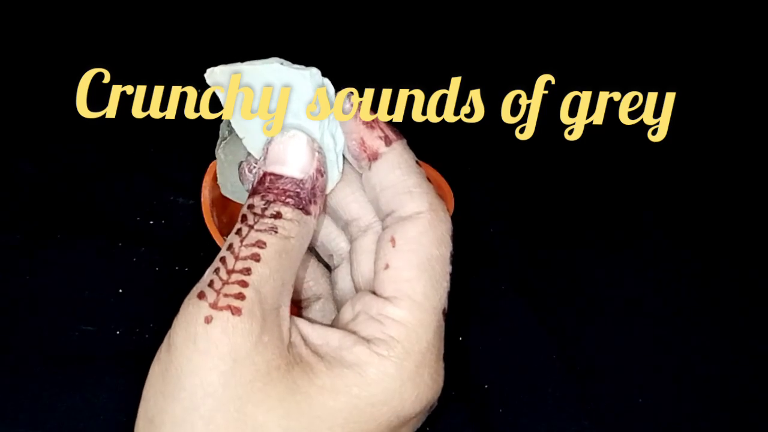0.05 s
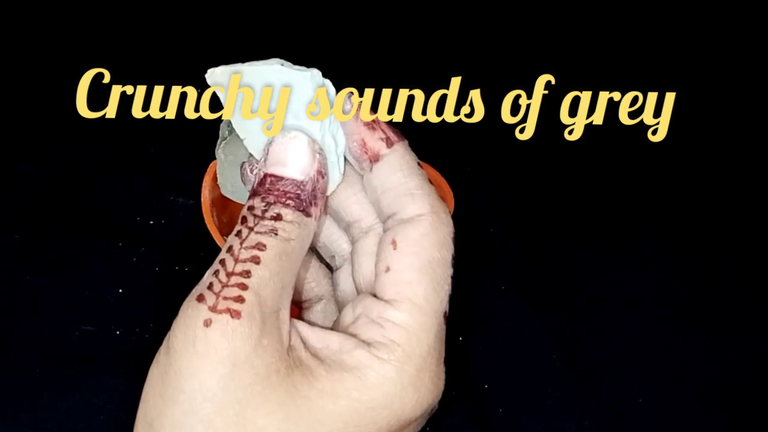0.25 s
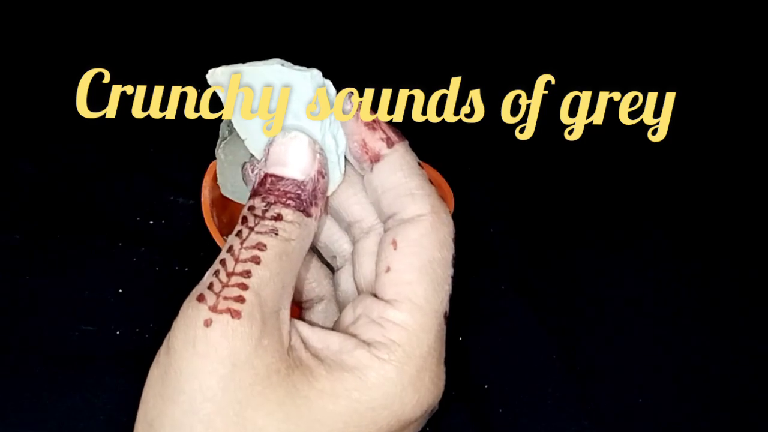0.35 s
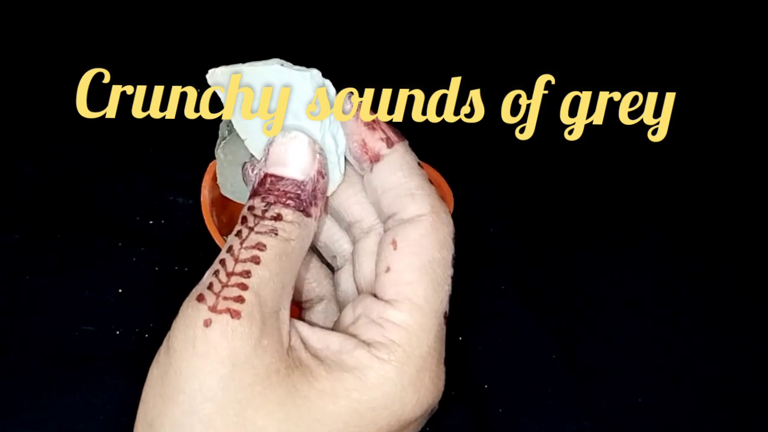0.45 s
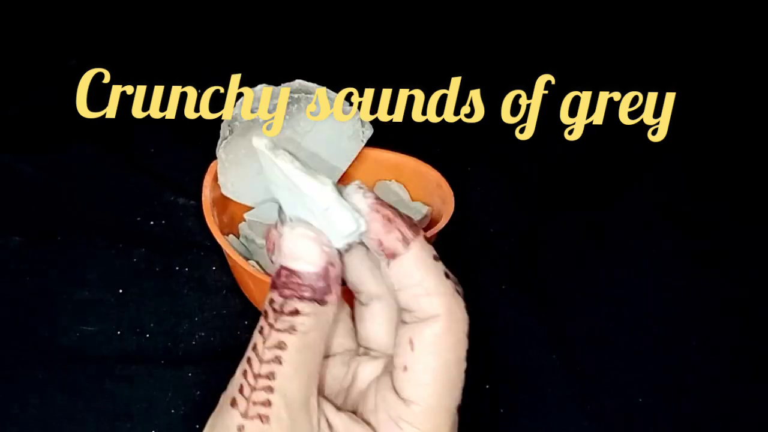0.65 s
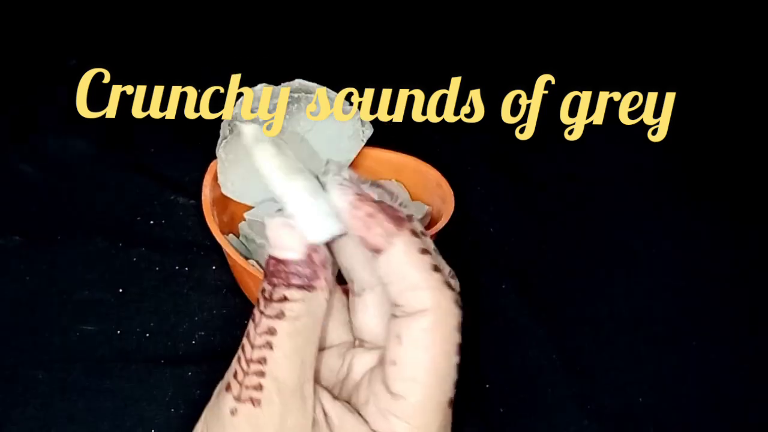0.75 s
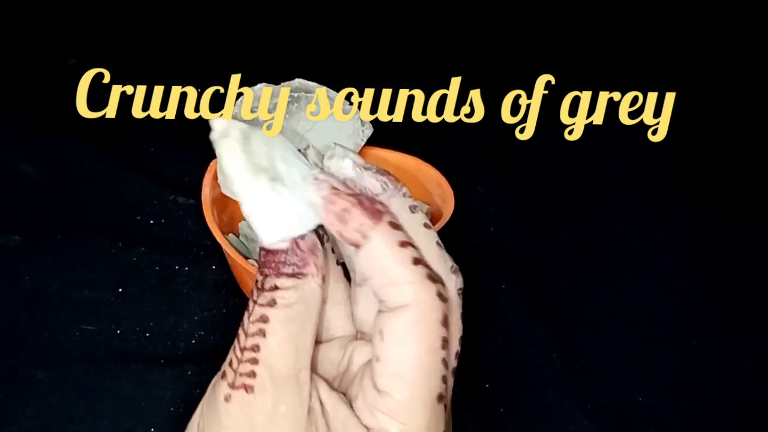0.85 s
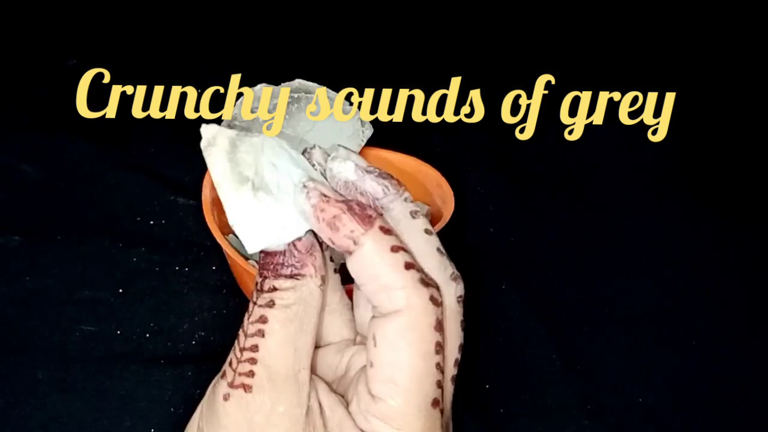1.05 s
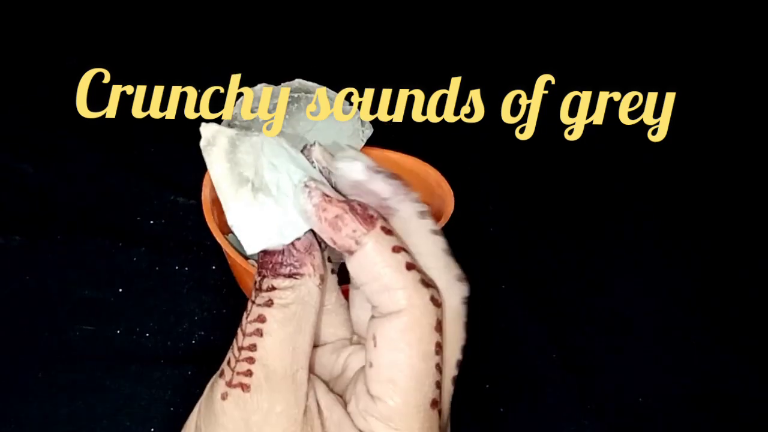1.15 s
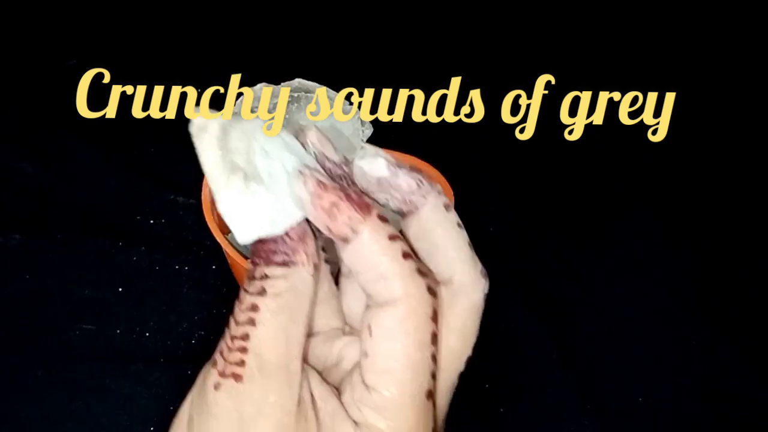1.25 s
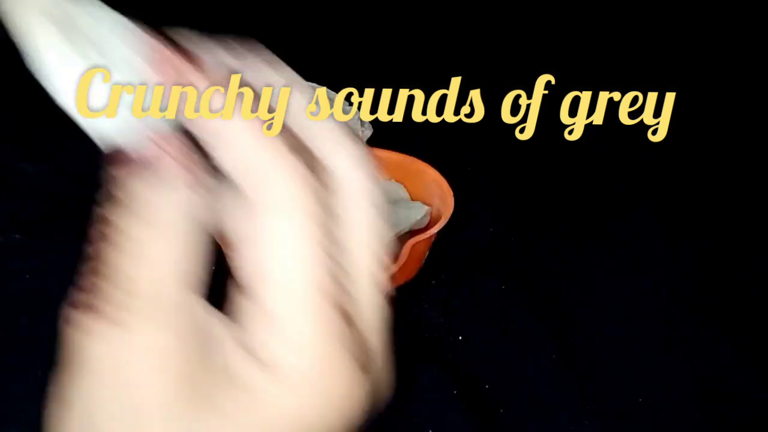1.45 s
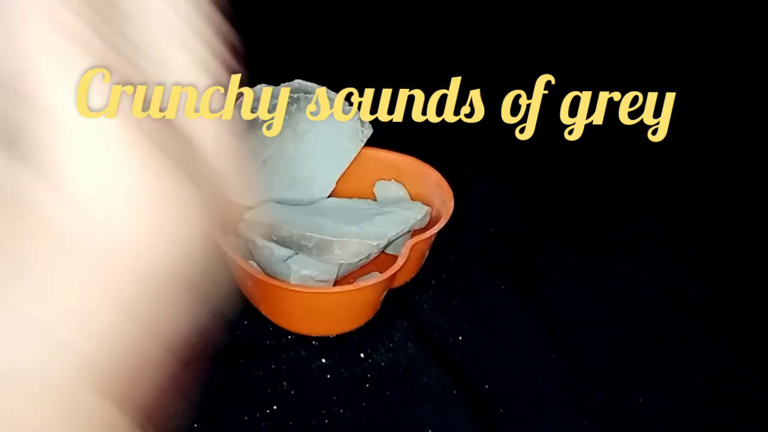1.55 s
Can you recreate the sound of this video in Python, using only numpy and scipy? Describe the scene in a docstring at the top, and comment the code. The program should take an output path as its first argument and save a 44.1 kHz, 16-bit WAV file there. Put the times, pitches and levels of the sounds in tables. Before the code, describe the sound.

Dry clay snaps by hand with a quick run of brittle cracks, then near silence.

```python
"""In a small quiet room, fingers snap a slab of dry clay close to the microphone.
It strains twice, then gives way in a quick run of cracks, each a brittle snap (the clay rings)
over a hollow thump (the slab jolts in the hand). A crumb drops, fingers rub the pieces, and later
a few grains tick. A thin high hiss and a faint low drone go on throughout."""
import sys
import numpy as np
from scipy import signal
from scipy.fft import rfft, irfft
from scipy.io import wavfile

SR = 44100
rng = np.random.default_rng(int(sys.argv[2]) if len(sys.argv) > 2 else 0)


def to_wav(s):
    """Save 16-bit WAV."""
    ch = np.atleast_2d(s).T  # columns
    pcm = np.round(np.clip(ch, -1, 1) * 32767)  # PCM
    wavfile.write(sys.argv[1], SR, pcm.astype(np.int16))


N = 70560
LEFT_GRAIN_DB = -39   # dust and grains are almost only on the right

# the cracks in the slab: (time [s], thump level [dB], thump pitch [Hz], thump bandwidth [relative],
# snap level [dB], snap brightness [Hz])
CRACKS = [(0.2045, -35, 290, 0.43, -39, 2460), (0.2201, -33.5, 339, 0.26, -48.5, 1200),
          (0.2482, -13, 347, 0.59, -15.5, 8000), (0.2665, -12, 329, 0.51, -22, 7000),
          (0.2920, -12.5, 376.4, 0.7, -16.5, 7500), (0.3002, -18, 334, 0.5, -28, 6500),
          (0.3095, -21.5, 375, 0.74, -50, 3500)]


def snaps():
    """At each crack, one sharp break and a burst of splinters make the clay ring; dust fizzes on top."""
    # the tones of the clay: (pitch [Hz], level [dB], time to fade 60 dB [s])
    clay_tones = [(994, -17, .011), (1456, -13, 0.013), (2240, -13, 0.01), (2550, -9, 0.00708),
                  (3180, -2, 0.0033), (3872, -7.5, 0.0092), (4166, -8, 0.0086), (5136, -9.5, 0.0059),
                  (6530, -1.5, 0.0017), (7570, -8.5, 0.0042), (8550, -12, 0.0027)]
    force, dust = 0, 0
    for start, _, _, _, db, bright_hz in CRACKS:
        start += .0005   # the slab starts to move just before it parts
        splinters = from_db(-9) * shower(start, per_s=12000, fade_s=0.0092)
        splinters = butter(splinters, 7500, "low")   # duller than the break itself
        force += from_db(db) * butter(splinters - click(start), bright_hz, "low")
        dust_db = 1.41 * db - 8   # only hard cracks raise much dust
        dust += from_db(dust_db) * shower(start, per_s=6400, fade_s=0.018)
    left, right = place(ring_tones(bending_waves(force), clay_tones), left_db=-11.5)
    left = butter(left, 7000, "low")
    fizz = butter(dust, 10500, "high", order=4)
    return np.array([left, right]) + place(fizz, LEFT_GRAIN_DB)


def bending_waves(force, spread=0.28, stages=14):
    """Treble crosses the slab first, smearing each snap; these filters delay the low notes more."""
    return signal.sosfilt([[-spread, 1, 0, 1, -spread, 0]] * stages, force)


def thumps():
    """Each crack jolts the slab in the cupped hand: a few slow swings, damped by the grip."""
    out = 0
    for start, db, hz, width, _, _ in CRACKS:
        band_hz = hz * np.exp(np.array([-.5, .5]) * width)
        jolt = butter(-click(start), band_hz, "band")
        out += from_db(db) * jolt / np.abs(jolt).max()
    out = butter(out, 615, "low", order=3)
    return place(butter(out, 261, "high", order=1), left_db=-10.5)


def crumb():
    """A loose piece lands with a dull tap."""
    # its hits: (time [s], level [dB])
    hits = [(0.4913, -37.5), (0.4928, -42.5)]
    # the tones of what it lands on: (pitch [Hz], level [dB], time to fade 60 dB [s])
    surface_tones = [(249, 0, 0.025), (484, -1.5, 0.018), (914, 0, 0.019), (1100, -4.5, 0.015),
                     (1194, -9, 0.016), (2400, -6, 0.0062), (4300, 1, 0.032)]
    clicks = sum(from_db(db) * click(start) for start, db in hits)
    force = butter(clicks, [156, 1770], "band")
    return place(ring_tones(force, surface_tones), left_db=-18)


def grains():
    """Dry grains break under the fingers with tiny, very bright ticks."""
    # the ticks: (time [s], level [dB], lower edge [Hz])
    ticks = [(0.678, -56, 7000), (1.569, -39.5, 12000), (1.5786, -34.5, 11000), (1.5916, -34, 13240),
             (1.5941, -29, 3380)]
    out = 0
    for start, db, low_hz in ticks:
        spray = from_db(-2.5) * shower(start, per_s=15000, fade_s=0.012)
        out += from_db(db) * butter(click(start) + spray, low_hz, "high")
    return place(out, LEFT_GRAIN_DB)


def rubs(release_s=0.01):
    """Fingertips slide over the dusty clay: tiny friction clicks swell and stop."""
    # the strokes: (peak time [s], rise time [s], level [dB], lower edge [Hz], upper edge [Hz])
    strokes = [(0.227, 0.054, -57, 2400, 7780), (0.49, 0.04, -72.5, 6400, 7700),
               (0.83, 0.0088, -73, 6500, 8100), (0.83, 0.045, -62, 200, 267.7),
               (1.225, 0.019, -71, 7000, 8300)]
    t, out = np.arange(N) / SR, 0
    for peak, rise_s, db, low_hz, high_hz in strokes:
        grit = butter(random_clicks(per_s=2700), low_hz, "high")
        grit = unit_level(butter(grit, high_hz, "low", order=6))
        swell = np.exp(-np.maximum((peak - t) / rise_s, (t - peak) / release_s))
        out += from_db(db) * grit * swell
    return place(out, left_db=-15)


def room_echo(sound, build_s=0.0009, left_db=-3.5):
    """The room adds a faint, blurred echo that fades at its own speed in each band."""
    # the echo: (lower edge [Hz], upper edge [Hz], level [dB], time to fade 60 dB [s])
    bands = [(93, 358, -15, 0.421), (314, 650, -13.5, 0.34), (804, 1960, -9, 0.33),
             (1900, 9270, -13.5, 0.29)]
    t, tail = np.arange(SR // 2) / SR, 0
    for low_hz, high_hz, db, fade_s in bands:
        noise = rng.standard_normal((2, len(t))) * (1 - np.exp(-t / build_s))
        noise = unit_level(noise * fade(t, fade_s)) / np.sqrt(len(t))
        tail += from_db(db) * butter(noise, [low_hz, high_hz], "band", order=3)
    return signal.fftconvolve(sound[None], tail, axes=1)[:, :N] * from_db([[left_db], [0]])


def hiss(rise_s=0.001, settle_s=0.016):
    """A thin band of high noise wavers and now and then flares up."""
    # the band: (pitch [Hz], width [Hz], left level [dB], right level [dB], left-right likeness [-1..1])
    band = (6303, 347.5, -56.5, -54, -0.08)
    # its wavering: (time [s], level change [dB])
    swell = [(0, -2), (0.25, -4.5), (0.42, -3), (0.48, 5), (0.548, -4), (0.61, 0.5), (0.68, -4.5),
             (0.849, 1.5), (0.901, -3), (0.97, 2), (1.04, -2.5), (1.11, 0), (1.179, -1.5), (1.311, -2.5),
             (1.6, -1)]
    # its flares: (time [s], boost [dB])
    flares = [(0.573, 9), (0.694, 6.5), (1.336, 9), (1.469, 5.5)]
    t, flare_db = np.arange(N) / SR, 0
    for peak, db in flares:
        onset = np.clip((t - peak) / rise_s + 1, 0, 1)
        flare_db += db * onset * np.exp(-np.abs(t - peak) / settle_s)
    return fluttering_band(band, swell, flare_db)


def drone():
    """A narrow band of low noise swells and fades."""
    # the band: (pitch [Hz], width [Hz], left level [dB], right level [dB], left-right likeness [-1..1])
    band = (335, 20, -67, -64.5, -0.31)
    # its swelling: (time [s], level change [dB])
    swell = [(0, -4.5), (0.1, -17), (0.3, -8), (0.448, 1.5), (0.68, 2), (0.79, 7), (0.87, 3), (0.91, -4.5),
             (0.96, 2), (1.142, 2.5), (1.185, -12), (1.24, -0.5), (1.32, -13), (1.39, -0.5), (1.51, -8),
             (1.6, 1.5)]
    return fluttering_band(band, swell)


def room_noise(level_db=-66.5, left_db=-3, sink_db_per_s=1.95):
    """Soft room noise slowly gets quieter."""
    # its tone colour: (frequency [Hz], relative level [dB])
    colour = [(25, -14), (60, -9), (100, 7), (150, -7.5), (220, 8.5), (285, -3.5), (440, -4.5), (620, -11),
              (950, -10.5), (1300, -13.5), (5000, -17), (8500, -31.5), (13000, -23), (15300, -35.5)]
    # how alike left and right are: (frequency [Hz], likeness [-1..1])
    likeness = [(30, 0.96), (200, 0.38), (500, 0.075), (1500, 0.037), (15000, 0.046)]
    t, freqs = np.arange(N) / SR, np.arange(N // 2 + 1) * SR / N
    noise = stereo_noise(from_db(at_hz(colour, freqs)), at_hz(likeness, freqs))
    return from_db(level_db - sink_db_per_s * t + [[left_db], [0]]) * noise


def fluttering_band(band, swell, flare_db=0, flutter_db=2.3, flutter_hz=8.4, top_hz=6550):
    """Noise around one pitch; its level follows the swell and flutters a little at random."""
    hz, width, left_db, right_db, likeness = band
    t, freqs = np.arange(N) / SR, np.arange(N // 2 + 1) * SR / N
    flutter = irfft(rfft(rng.standard_normal(N)) / (1 + (freqs / flutter_hz) ** 2), N)
    db = np.interp(t, *np.transpose(swell)) + flare_db + flutter_db * unit_level(flutter)
    hump = 1 / (1 + np.abs((freqs - hz) / (0.78 * width)) ** 2.78)
    steep_top = 1 / np.sqrt(1 + (freqs / top_hz) ** 40)
    return from_db(db + [[left_db], [right_db]]) * stereo_noise(hump * steep_top, likeness)


def stereo_noise(gain, likeness):
    """Noise shaped by a gain and a left-right likeness at each frequency."""
    shared, opposed = rfft(rng.standard_normal((2, N)))
    spectrum = np.sqrt(1 + likeness) * shared + np.sqrt(1 - likeness) * opposed * [[1], [-1]]
    return unit_level(irfft(gain * spectrum, N))


def place(sound, left_db, lead_s=0.00034):
    """The microphone's left side hears the hands earlier and weaker."""
    n = np.arange(N)
    left = from_db(left_db) * np.interp(n + round(lead_s * SR), n, sound)
    return np.array([left, sound])


def click(time_s):
    """One click of height 1."""
    return 1. * (np.arange(N) == int(time_s * SR))


def random_clicks(per_s):
    """Clicks at random times and strengths."""
    return (rng.random(N) < per_s / SR) * rng.standard_normal(N)


def shower(start, per_s, fade_s):
    """A burst of random clicks that dies away."""
    return random_clicks(per_s) * fade(np.arange(N) / SR - start, fade_s)


def fade(t, fade_s):
    """Silent until t = 0, then falling from 1 by 60 dB every fade_s."""
    return (t > 0) * from_db(-60 * np.maximum(t, 0) / fade_s)


def ring(force, hz, fade_s):
    """Each push starts a tone that dies away."""
    decay, angle = from_db(-60 / (fade_s * SR)), 2 * np.pi * hz / SR
    return signal.lfilter([.5, 0, -.5], [1, -2 * decay * np.cos(angle), decay * decay], force + 1e-18)


def ring_tones(force, tones):
    """A struck object rings with all its tones; neighbours swing in opposite directions."""
    return sum((-1) ** k * from_db(db) * ring(force, hz, fade_s)
               for k, (hz, db, fade_s) in enumerate(tones))


def butter(sound, hz, kind, order=2):
    """Keep what is below hz ("low"), above it ("high") or between two edges ("band")."""
    return signal.sosfilt(signal.butter(order, hz, kind, fs=SR, output="sos"), sound + 1e-18)


def at_hz(points, hz):
    """Read between a table's rows on a pitch-like (log) scale."""
    freqs, values = np.transpose(points)
    return np.interp(np.log(hz + 1), np.log(freqs), values)


def from_db(db):
    """Turn decibels into a multiplier."""
    return 10 ** (np.asarray(db) / 20)


def unit_level(sound):
    """Scale to an average (rms) level of 1."""
    return sound / np.sqrt(np.mean(sound ** 2) + 1e-20)


def scene():
    """The clay and its echo, over the background."""
    clay = thumps() + snaps() + crumb() + grains() + rubs()
    return clay + room_echo(clay[1]) + room_noise() + drone() + hiss()


def record(dry):
    """The microphone's opening rings at a very high pitch; above that the sound is cut steeply."""
    ring_hz, ring_db, fade_s, cutoff_hz = 15170, 16, 0.008, 16300
    ringing = ring(dry, ring_hz, fade_s) * 2 * np.log(1000) / (fade_s * SR)   # gain 1 at its pitch
    treble_cut = signal.ellip(10, .2, 70, cutoff_hz, fs=SR, output="sos")
    return signal.sosfilt(treble_cut, dry + from_db(ring_db) * ringing)


dry = scene()
out = record(dry)
to_wav(out)
```